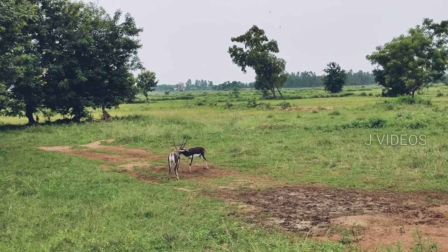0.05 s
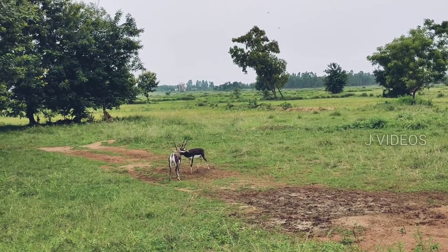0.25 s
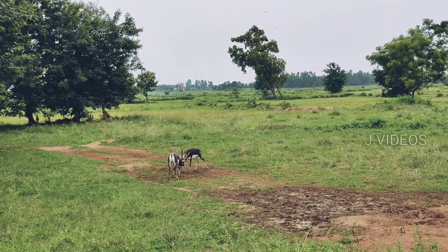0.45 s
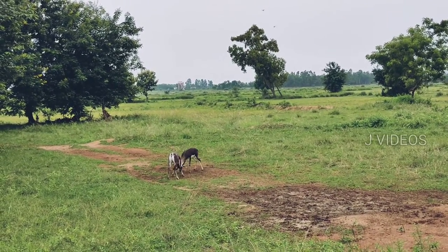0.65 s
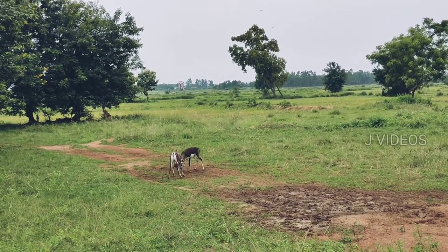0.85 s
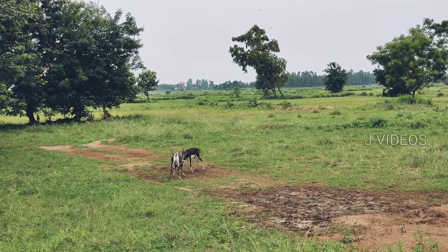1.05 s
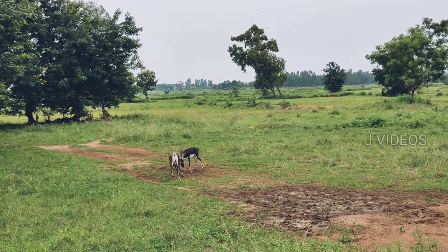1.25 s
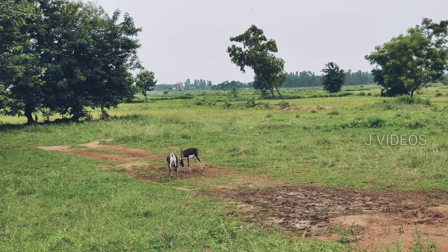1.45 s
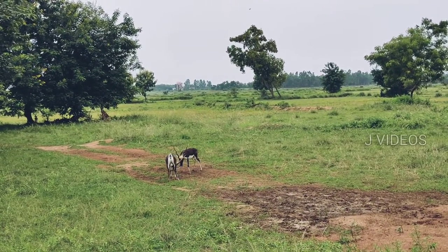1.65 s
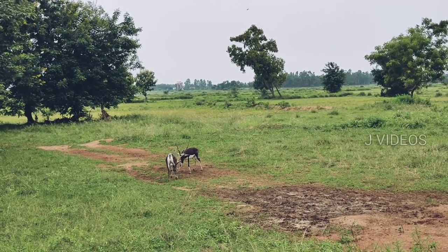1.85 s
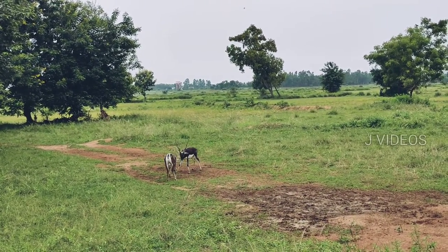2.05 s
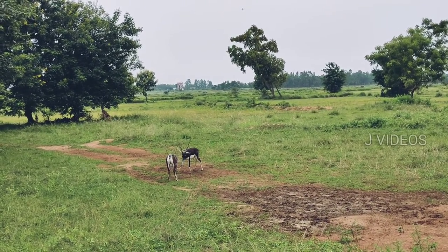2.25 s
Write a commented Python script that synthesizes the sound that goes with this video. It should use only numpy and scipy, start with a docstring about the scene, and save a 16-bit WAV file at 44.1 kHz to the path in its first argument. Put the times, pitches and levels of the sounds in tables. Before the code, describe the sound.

Antelope horns clash in one sharp distant crack while a close cricket chirps rhythmically.

```python
"""A grassy field: light wind puffs on two microphone ports, mostly one at a time; far birds whistle faintly.
From the start a close cricket chirps, its wing strokes making rhythmic groups of falling syllables.
At 0.6 s two distant antelopes clash horns in one sharp crack; lighter hollow knocks and rubbing follow
and die away by 2 s, while the cricket goes on. Trees and grass scatter the chirps and blows back."""
import sys
import numpy as np
from scipy import signal
from scipy.fft import rfft, irfft, next_fast_len
from scipy.io import wavfile
from scipy.ndimage import map_coordinates

SR = 44100
rng = np.random.default_rng(int(sys.argv[2]) if len(sys.argv) > 2 else 0)


def unload_audio(sound):
    """Save the sound as a 16-bit wav file, at the path given as the first command line argument."""
    columns = np.transpose(np.atleast_2d(sound))
    # keep every value between -1 and 1, then stretch to whole-number steps
    steps = np.round(np.clip(columns, -1, 1) * 32767)
    wavfile.write(sys.argv[1], SR, steps.astype(np.int16))


N = 105840
T = np.arange(N) / SR
N_FFT = 2 * next_fast_len(N)
BIN_HZ = np.fft.rfftfreq(N_FFT, 1 / SR)


def amp(db):
    """Decibels to gain."""
    return 10 ** (np.asarray(db) / 20)


def unit(x):
    """Scale to rms 1."""
    return x / np.sqrt(np.mean(x ** 2) + 1e-20)


def along(points, hz):
    """Interpolate (f/Hz, value) points on a log frequency axis."""
    f, v = np.transpose(points)
    return np.interp(np.log(hz + 1), np.log(f + 1), v)


def wobble(rate_hz):
    """Smooth random curve, rate_hz knots a second."""
    return map_coordinates(rng.standard_normal(N // 8), [T * rate_hz], mode="wrap")


def swell(s, half_s):
    """Bell envelope centred on time s."""
    return np.exp(-((T - s) / half_s) ** 2)


def decay(t, t60_s):
    """Exponential fall, 60 dB in t60_s."""
    return np.exp(-np.log(1000) * t / t60_s)


def coloured(x, spectrum):
    """Minimum-phase filter of unit energy."""
    cepstrum = irfft(np.log(amp(along(spectrum, BIN_HZ))))
    cepstrum[1:N_FFT // 2] *= 2
    cepstrum[N_FFT // 2 + 1:] = 0
    response = np.exp(rfft(cepstrum))
    response /= np.sqrt(np.mean(abs(response) ** 2))
    return irfft(rfft(x, N_FFT) * response, N_FFT)[..., :N]


def noise(spectrum):
    """Two independent coloured noises, rms 1."""
    return unit(coloured(rng.standard_normal((2, N)), spectrum))


def pan(db):
    """Port gains for an L-R difference; the nearer port gets 1."""
    return amp(np.minimum([[db], [-db]], 0))


def ports(x, pan_db, lag_ms):
    """Direct sound at both ports, the left lag_ms after the right."""
    phase = np.exp(np.array([[-1j], [1j]]) * np.pi * BIN_HZ * lag_ms / 1000)
    return pan(pan_db) * irfft(rfft(x, N_FFT) * phase, N_FFT)[:, :N]


# field decay: f/Hz, t60/s
FIELD_T60 = [(200,0.17),(1000,0.86),(3000,.55),(6700,.62),(8000,0.53)]
def field(x, build_s, end_s):
    """Diffuse scatter from grass and trees, different at each port."""
    hz, t, bins = signal.stft(rng.standard_normal((2, SR)), SR, nperseg=256)
    window = (1 - np.exp(-t / build_s)) * np.exp(-(t / end_s) ** 6)
    damping = decay(t, along(FIELD_T60, hz)[:, None])
    tail = signal.istft(bins * damping * window, SR, nperseg=256)[1]
    return signal.fftconvolve(x[None], tail / np.linalg.norm(tail[0]), axes=1)[:, :N]


# spectra: f/Hz, relative level/dB
RUSH_SPECTRUM = [(250,-37.5),(420,1),(590,14),(750,-17),(1000,-38)]
AIR_SPECTRUM = [(25,7),(100,-8),(300,-20),(560,-9.5),(900,-20.5),(2000,-26.5),(6000,-26),(9000,-36.5),(15000,-44.5),(17000,-44)]
# rush envelope: t/s, level/dB
RUSH_LEVEL = [(0,-94),(.35,-86),(1.0,-84.5),(1.25,-84.5),(1.35,-87.5),(1.65,-82.5),(2.05,-84),(2.2,-101.5),(2.4,-95.5)]
def air(air_db=-82):
    """A faint, hollow, far rush and the wavering hiss of open air."""
    rush = amp(np.interp(T, *np.transpose(RUSH_LEVEL))) * noise(RUSH_SPECTRUM)[0]
    return rush + pan(0.43) * amp(air_db + wobble(11)) * noise(AIR_SPECTRUM)


# whistles: t/s, half length/s, f/Hz, relative level/dB
WHISTLES = [(0.027,0.052,1844,-88.5),(0.068,0.12,1364,-94.5),(0.215,.035,2740,-92),(0.258,.035,1658,-92.5),(1.361,0.065,3130,-91.5),(1.455,0.046,2944,-87),(1.544,0.018,3100,-92),(1.748,0.017,3466,-90.5),(0.198,0.011,5610,-80)]
def birds(gain_db=-8, flutter_db=10.5, waver_hz=34):
    """Thin, fluttering far whistles, blurred by the field."""
    flutter = amp(flutter_db * np.tanh(2 * wobble(45)))
    calls = np.zeros(N)
    for s, half_s, hz, db in WHISTLES:
        phase = 2 * np.pi * np.cumsum(hz + waver_hz * wobble(120)) / SR
        calls += amp(db) * swell(s, half_s) * flutter * np.sin(phase)
    return amp(gain_db) * (calls + field(calls, build_s=0.004, end_s=0.2))


# puffs: t/s, peak level/dB, f/Hz, half length/s, L-R/dB
PUFFS = [(.222,-28.5,130.3,0.0047,-22.5),(.481,-29,122,0.0045,-39.5),(.614,-24,138.7,0.01,28),(.627,-24.5,142,0.0033,20),(.902,-29,122.5,0.0084,52.5),(.909,-42,213,0.0077,22),(0.615,-38.5,289.3,0.012,11.5),(1.942,-27.5,189,0.0034,32.5),(2.054,-34.5,115.7,0.0049,25)]
# eddies: t/s, half length/s, level/dB, L-R/dB
EDDIES = [(-0.017,0.083,-47,-5),(0.267,0.087,-50.5,-16.5),(.48,0.036,-45.5,-24),(0.592,0.036,-44.5,-0.5),(0.68,0.086,-44,-4.5),(0.786,0.037,-45,4.5),(0.901,0.052,-48,10.5),(1.06,0.13,-58.5,9.5),
          (1.479,0.033,-47.5,32),(1.68,0.049,-54,28.5),(1.936,0.026,-41,17.5),(1.992,0.028,-44,2),(2.057,.04,-48,17),(2.148,0.022,-52,5),(0.129,0.021,-52.5,4.5),(1.793,0.045,-63.5,9),(1.374,0.059,-71,-2),(1.578,0.024,-60.5,12),(2.213,.05,-64.5,10)]
# breeze envelope: t/s, relative level/dB
GUSTS = [(0,0),(1.1,-1),(1.27,-7),(1.55,3.5),(1.8,-2.5),(2.2,5.5),(2.4,0)]
# turbulence: f/Hz, relative level/dB
WIND_SPECTRUM = [(25,-18.5),(50,-12.5),(85,4),(130,5),(180,-5),(280,-20),(450,-28.5),(900,-46),(2000,-74)]
def wind(breeze_db=-69.5):
    """Low puffs and fluttering eddies on each port, over a faint breeze."""
    puffs = sum(pan(side_db) * amp(db) * swell(s, half_s) * np.cos(2 * np.pi * hz * (T - s))
                for s, db, hz, half_s, side_db in PUFFS)
    eddy_power = sum((pan(side_db) * amp(db) * swell(s, half_s)) ** 2
                     for s, half_s, db, side_db in EDDIES)
    breeze = amp(breeze_db + np.interp(T, *np.transpose(GUSTS)))
    return puffs + np.sqrt(breeze ** 2 + eddy_power) * noise(WIND_SPECTRUM)


# tick impulses: t/s, level/dB
TICKS = [(0.167,-53),(0.296,-42.5),(1.173,-42),(1.628,-51)]
# tick colour: f/Hz, relative level/dB
TICK_SPECTRUM = [(1000,-40),(5000,-18),(7500,10),(10000,-1.5),(15000,-16)]
def ticks():
    """A few tiny, crisp ticks close by on the left."""
    impulses = np.zeros(N)
    for s, db in TICKS:
        impulses[round(s * SR)] = amp(db)
    return pan(18) * coloured(impulses, TICK_SPECTRUM)


# wing strokes: peak t/s, relative level/dB
WING_STROKES = [(0.079,-54),(.159,-53),(0.173,-50.5),(.249,-52.5),(0.265,-43.5),(.294,-41),(0.323,-41),(0.404,-55),(.417,-49.5),(0.499,-51.5),(0.578,-52),
                (.680,-53.5),(0.756,-51),(.774,-42.5),(0.8,-41),(.830,-41.5),(.905,-54.5),(1.067,-56.5),(1.164,-55.5),(1.179,-46),(1.207,-41),(1.235,-41.5),
                (1.316,-56.5),(1.331,-48),(1.407,-52),(1.497,-52.5),(1.571,-54.5),(1.586,-46),(1.615,-40.5),(1.645,-40),(1.721,-55.5),(1.737,-47.5),
                (1.816,-51),(1.895,-52.5),(1.975,-56.5),(1.990,-51.5),(2.067,-53),(2.082,-43),(2.112,-40),(2.140,-40),(2.229,-51),(2.323,-51.5),(2.402,-52.5)]
# mid-stroke pitch: t/s, f/Hz
CRICKET_PITCH = [(0, 6622), (1.1, 6645), (1.65, 6630), (2.4, 6677)]
# scattered song, wing-file scratch: f/Hz, relative level/dB
SONG_ECHO_TILT = [(6000,-20),(6400,-3),(6700,0.5),(7100,3),(7500,13.5),(8000,5.5)]
RASP_SPECTRUM = [(2000,-22.5),(4500,-14.5),(6000,11.5),(8000,14.5),(9500,-41.5),(14000,-20)]
def cricket(gain_db=0.5, pan_db=9, echo_db=-12.5, rasp_db=-35.5):
    """Each wing stroke is a scratchy tone that swells and fades as its pitch slides down."""
    rise_s, fall_s, sweep_hz, bend_hz = 0.01, 0.011, 415, 162  # for a stroke at full_db
    full_db, doubling_db, waver_hz = -41.5, 19.5, 28
    song, force = np.zeros((2, N))
    drift_hz = waver_hz * wobble(460)
    for s, db in WING_STROKES:
        stretch = 2 ** ((db - full_db) / doubling_db)  # louder: longer, wider sweep
        at = (T > s - rise_s * stretch) & (T < s + fall_s * stretch)
        t = (T[at] - s) / stretch
        rise, fall = t / rise_s, t / fall_s
        slide_hz = (bend_hz * rise ** 2 - sweep_hz * rise) * stretch ** 0.94
        hz = np.interp(s, *np.transpose(CRICKET_PITCH)) + slide_hz + drift_hz[at]
        arch = np.abs(np.cos(np.pi / 2 * np.where(t < 0, rise, fall)))
        envelope = amp(db + gain_db) * arch ** np.where(t < 0, 1.33, 3.1)
        force[at] += envelope
        song[at] += envelope * np.sin(2 * np.pi * np.cumsum(hz) / SR)
    song *= amp(1.1 * wobble(400))
    tilt = amp(along(SONG_ECHO_TILT, np.fft.rfftfreq(N, 1 / SR)))
    echo = amp(echo_db) * field(irfft(rfft(song) * tilt, N), build_s=0.0017, end_s=0.13)
    rasp = amp(rasp_db) * force * noise(RASP_SPECTRUM)
    return ports(song, pan_db, lag_ms=0.012) + pan(pan_db) * (echo + rasp)


# horn-on-horn scrapes: t/s, half length/s, level/dB
SCRAPES = [(0.669,0.018,-56.5),(1.05,0.023,-64),(1.117,0.033,-63),(1.188,0.033,-70.5),(1.504,0.057,-70.5),(1.569,0.036,-71),(1.761,.05,-88),(1.97,0.021,-92.5)]
# scrape colour: f/Hz, relative level/dB
SCRAPE_SPECTRUM = [(300,-25),(450,-14.5),(590,4.5),(720,2),(870,12.5),(1050,-21),(1280,-21),(1500,-41),(3300,-28.5),(7000,-53.5)]
def horn_rubbing(pan_db=8.5, chatter_db=9):
    """Locked horns grate in short, uneven, hollow scrapes."""
    envelope = sum(amp(db) * swell(s, half_s) for s, half_s, db in SCRAPES)
    chatter = amp(chatter_db * np.tanh(2 * wobble(110)))
    friction = rng.standard_normal(N) * chatter
    return pan(pan_db) * envelope * unit(coloured(friction, SCRAPE_SPECTRUM))


def ringing(modes, t, attack_s, detune):
    """Damped modes, slightly different at every blow."""
    ring = np.zeros(len(t))
    for hz, db, t60_s in modes:
        envelope = amp(db + rng.normal(0, 2.4)) * decay(t, t60_s)
        tuned_hz = hz * (1 + detune * rng.normal())
        ring += envelope * np.sin(2 * np.pi * (tuned_hz * t + rng.random()))
    return (1 - np.exp(-(t / attack_s) ** 2)) * ring


# horn contacts: t/s, relative snap level/dB, relative ring level/dB
CONTACTS = [(.5915,-24,-42),(0.5936,-20.5,-42.5),(.5968,-26.5,-41),(.6000,-31,-54),(.620,-58.5,-43.5),(.630,-49.5,-52),(.6665,-43,-38),(.677,-49,-41.5),
            (.692,-55,-43),(.702,-70.5,-52),(.710,-65.5,-49),(.776,-69,-57),(.814,-59.5,-49),(.910,-74,-57.5),(1.041,-92.5,-77),(1.075,-92.5,-78),(1.118,-86,-74),(1.138,-77.5,-60),(1.442,-79,-55),(1.48,-85,-66),(1.535,-96.5,-72.5),(1.675,-92,-71),(1.774,-84,-79)]
# hollow horns, hard tips: f/Hz, relative level/dB, t60/s
HORN_MODES = [(259.3,-4,0.044),(347,-8.5,0.072),(461.6,-9.5,0.079),(575,2.5,0.042),(701.5,-0.5,.06),(801,0.5,0.038),(911,-11.5,0.073),(1219,-7.5,.05),(1274,-8,0.069)]
TIP_MODES = [(2020,-15,0.094),(3800,-13,0.04),(3680,-25.5,0.037),(4100,0.5,.04),(5180,-28.5,0.04),(5940,-5.5,0.02),(6360,-9,0.046),(6345,-11.5,.05),(6950,7,0.12),(6700,-2,0.11)]
# hard contact, soft contact, scattered crack: f/Hz, relative level/dB
CRACK_SPECTRUM = [(300,-20.5),(900,-22.5),(1500,-29),(2400,-19.5),(4000,-7),(5500,-1.5),(6800,7.5),(7600,-2),(8300,-49),(12000,-66)]
CLACK_SPECTRUM = [(300,-7.5),(900,-3),(1600,-6.5),(2400,-2),(3500,0.5),(4600,-5.5),(6500,-8.5),(7600,-22),(8300,-48),(12000,-63)]
CRACK_ECHO_SPECTRUM = [(300,-11.5),(900,-14),(1500,-13.5),(2200,-10),(3500,-8.5),(5000,-6),(6700,2.5),(7600,-3.5),(8300,-43),(12000,-67)]
def horn_clash(lag_ms=0.065, echo_end_s=0.33):
    """Hard contacts crack and ring the tips, soft ones clack; all ring the hollow horns and scatter."""
    hard_above_db, blend_db = -36, 4
    impulse_db, grit_db, splinter_db, tip_db, hollow_db = 12.5, -7.5, -32.5, -22, -4
    hard, soft, tips, ring = np.zeros((4, N))
    for s, snap_db, ring_db in CONTACTS:
        start = round(s * SR)
        t = T[:N - start][:SR // 4]
        at = slice(start, start + len(t))
        hardness = (1 + np.tanh((snap_db - hard_above_db) / blend_db)) / 2
        grit = rng.standard_normal(len(t)) * (decay(t, 0.0055) + amp(splinter_db) * decay(t, 0.023))
        hard[at] += amp(snap_db) * hardness * (amp(impulse_db) * (t == 0) + amp(grit_db) * grit)
        soft[at] += amp(snap_db) * (1 - hardness) * rng.standard_normal(len(t)) * decay(t, 0.014)
        tip_ring = ringing(TIP_MODES, t, attack_s=0.0008, detune=0.0013)
        tips[at] += amp(snap_db + tip_db) * hardness * tip_ring
        ring[at] += amp(ring_db + hollow_db) * ringing(HORN_MODES, t, attack_s=0.0015, detune=0.025)
    clack = coloured(soft, CLACK_SPECTRUM)
    bright = coloured(hard, CRACK_SPECTRUM) + tips + clack
    direct = ports(bright, pan_db=6.5, lag_ms=lag_ms) + ports(ring, pan_db=2, lag_ms=lag_ms)
    bright_echo = field(coloured(hard, CRACK_ECHO_SPECTRUM) + clack, build_s=0.0027, end_s=echo_end_s)
    ring_echo = field(ring, build_s=0.01, end_s=echo_end_s)
    return direct + pan(3.1) * amp(-11) * bright_echo + amp(-18.5) * ring_echo


def scene():
    """All sources at the two ports."""
    return cricket() + horn_clash() + horn_rubbing() + birds() + ticks() + wind() + air()


def record(dry, top_hz=16000):
    """Brick-wall band limit."""
    return irfft(rfft(dry, N_FFT) * (BIN_HZ < top_hz), N_FFT)[..., :N]


dry = scene()
out = record(dry)
unload_audio(out)
```